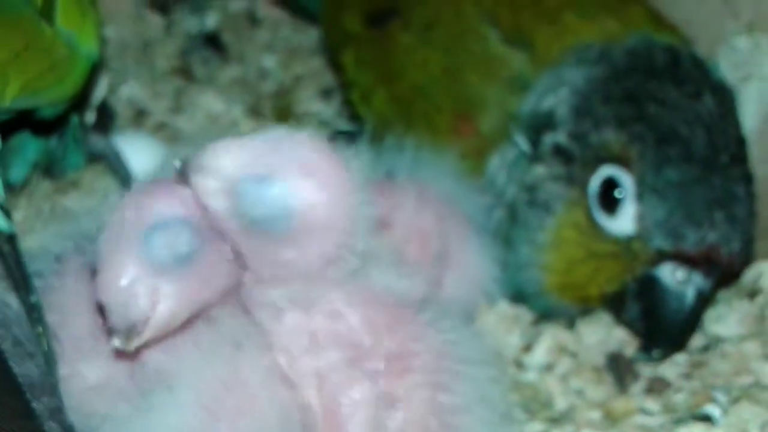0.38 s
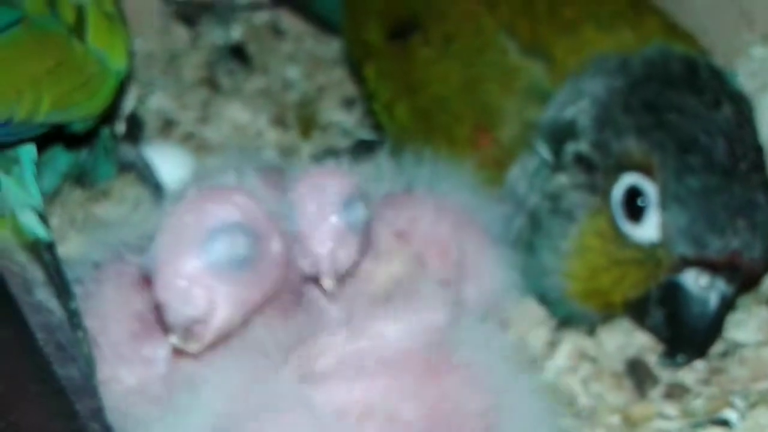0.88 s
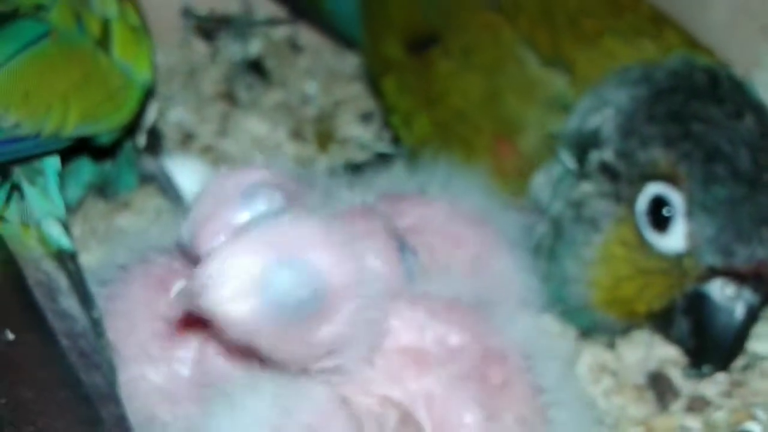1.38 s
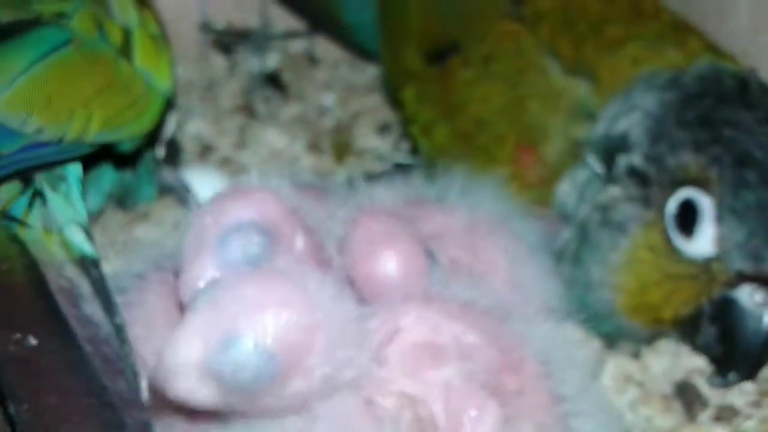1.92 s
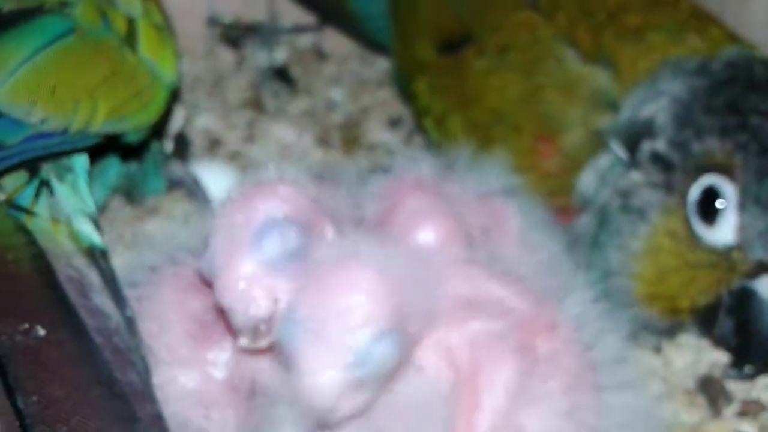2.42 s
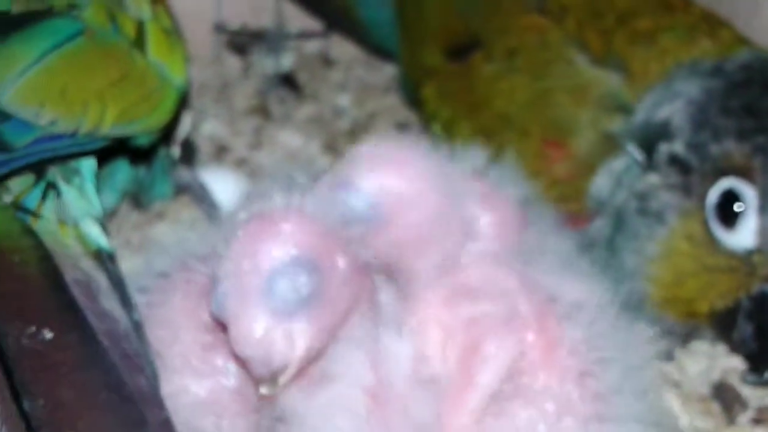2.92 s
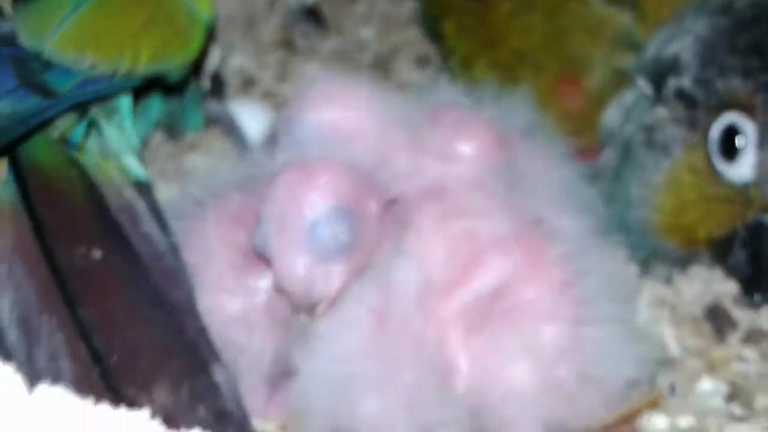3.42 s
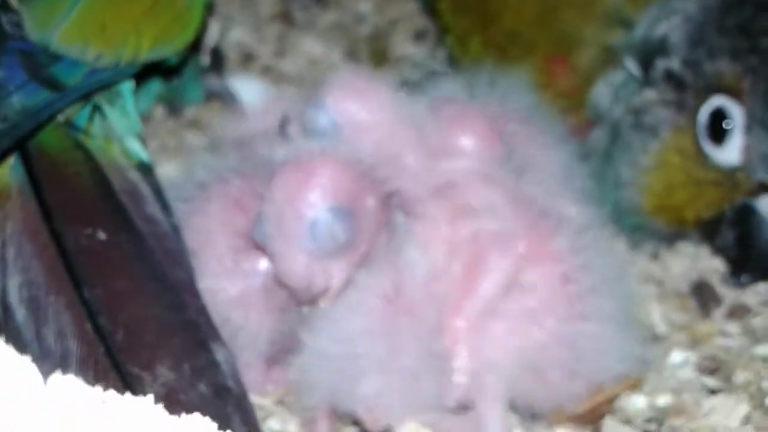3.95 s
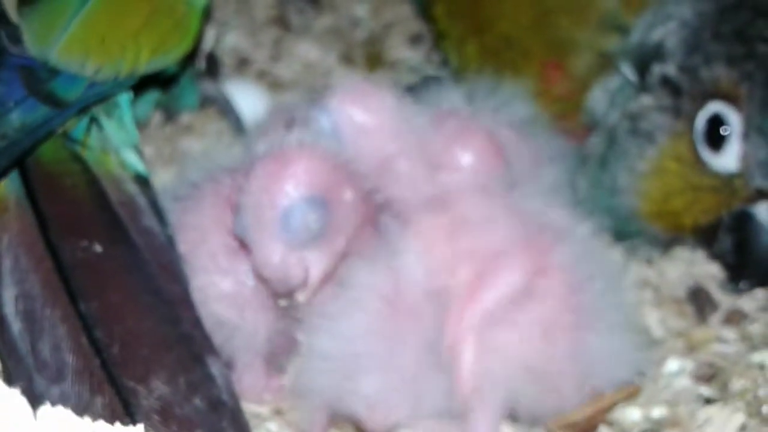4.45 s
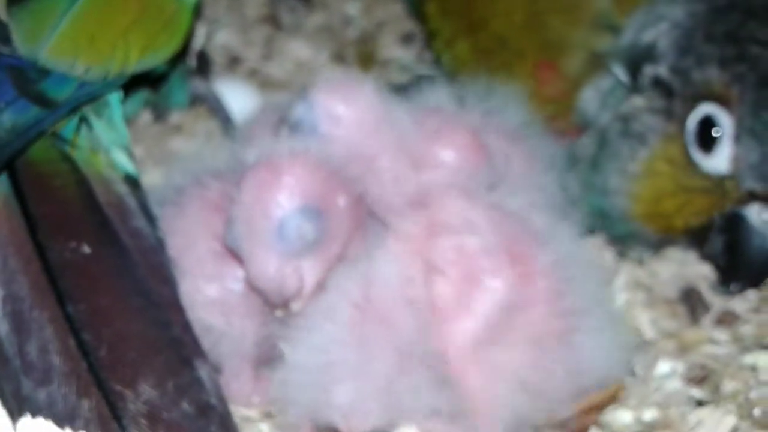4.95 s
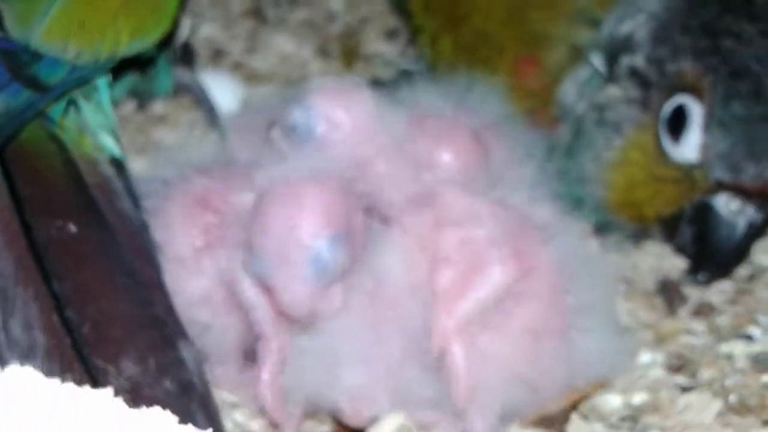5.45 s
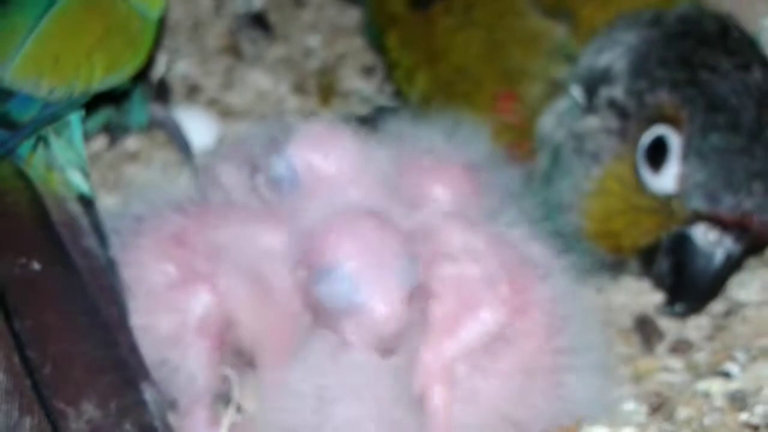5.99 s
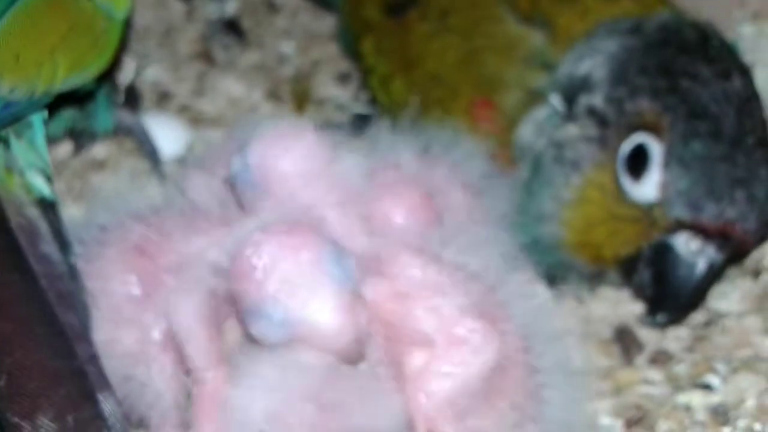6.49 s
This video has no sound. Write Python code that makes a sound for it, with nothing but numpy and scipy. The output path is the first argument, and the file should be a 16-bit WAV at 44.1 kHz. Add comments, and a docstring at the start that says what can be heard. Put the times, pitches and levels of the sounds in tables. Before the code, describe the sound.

Parrot chicks beg very near a small microphone in a wooden nest box, with short bright reflections and a faint room hush. A chick is already rasping at the start, in airy, rough bursts to about 0.6 seconds, with a thin whistle wavering beside it. Peeps and short whistles cluster from 0.5 to 1 second. Harsh five-part squawks at 1.0 and 1.25 alternate low rising buzzes with shrill cries. Hissing rasps repeat from 1.4 to 2.4, then the calls grow faint and sparse. Tiny chirps and whistles flurry around 3.0 to 3.3, followed by another squawk. Three strong rasps come between 3.75 and 4.3. A soft double wall nudge at 4.55 precedes a squawk at 4.7, more rasps around 5 to 5.5, a leaping whistle at 5.4, and final squawks at 5.6 and 5.8. Quiet follows, with barely audible peeping, before a soft hollow hiss swells from 6.3 to 6.6.

```python
"""Parrot chicks beg in a small wooden nest box, close to the microphone, over a quiet room hush.
One is already rasping in hissing bursts made by a rough membrane and air; a long whistle wavers beside it.
Softer peeps and whistles, tones with a few overtones, soon join in, and the box rings briefly after each call.
From about one second a chick repeats a five-part squawk, in which two membranes take turns.
Later the wooden wall is nudged twice, and at the end a soft hollow hiss of filtered noise grows."""
import sys
import numpy as np
from scipy import signal
from scipy.fft import rfft, irfft
from scipy.io import wavfile
from scipy.ndimage import uniform_filter1d, minimum_filter1d

SR = 44100
rng = np.random.default_rng(int(sys.argv[2]) if len(sys.argv) > 2 else 0)


def store_pcm(level_fs):
    """Save levels as 16-bit WAV."""
    pcm = np.round(np.clip(level_fs, -1, 1) * 32767).astype(np.int16)
    wavfile.write(sys.argv[1], SR, np.atleast_2d(pcm).T)


def field_ratio(decibels):
    """Amplitude ratio for a level in dB (20 dB per decade); scalars and array-likes work."""
    return 10 ** (np.asarray(decibels, dtype=float) / 20)


N = 291501  # length in samples

# The room hush. Each row: frequency in Hz, relative strength in dB.
HUSH_SPECTRUM = [(12, -44.5), (20, -16), (175, -11.5), (906, -16.5), (1630, -13), (2470, -18), (3170, -22),
                 (3450, -18), (5090, -17), (6540, -16.5), (7950, -25.5), (9130, -27.5), (15500, -30)]
# How the hush drifts. Each row: time in seconds, level in dB of its part between 60 and 500 Hz.
HUSH_LEVEL = [(0.0, -60.5), (0.62, -64.5), (1.16, -61), (1.58, -73.5), (1.86, -71), (2.08, -67.5),
              (2.61, -62.5), (2.93, -66.5), (3.18, -63.5), (3.59, -69), (3.85, -70), (4.67, -61),
              (5.15, -71.5), (5.36, -72.5), (5.45, -68.5), (6.35, -77), (6.61, -68.5)]

# Rasps: each swells while the chick pushes, then dies away. Each row: start in seconds, length of the push
# in seconds, swell time in seconds, level in dB at full swell, first pitch in Hz, held pitch in Hz,
# extra lowest line in dB once its early lead is over.
RASPS = [(-.06, 0.067, .02, -14.5, 2100, 2902, -4.5), (0.144, 0.087, 0.033, -12, 2100, 2816, -4),
         (.365, 0.14, 0.07, -12, 2350, 2868, -2), (0.564, 0.04, 0.014, -22, 2600, 2574, -14),
         (.788, 0.054, 0.005, -35, 2830, 3080, 8), (0.943, .085, 0.0061, -28.5, 2190, 2210, -2),
         (1.386, 0.024, .006, -20.5, 2900, 2900, -9.5), (1.49, .16, .028, -22.5, 2100, 3036, 1),
         (1.72, 0.15, 0.037, -20.5, 2300, 3036, 2.5), (1.945, .16, 0.037, -16, 1600, 2870, 3),
         (2.109, 0.062, 0.013, -15, 2950, 3282, -13.5), (2.271, 0.083, 0.031, -14, 2190, 2888, -2),
         (2.47, 0.051, 0.021, -42, 2800, 2610, -2), (2.636, .04, 0.015, -49, 3100, 2980, 10),
         (2.685, 0.098, 0.0035, -44, 2360, 2380, 13), (3.038, 0.087, .003, -43, 2400, 2420, -6),
         (3.216, .03, 0.0045, -42, 2600, 2705, -19), (3.764, .082, .02, -17, 2100, 2955, -4.5),
         (3.974, .091, 0.029, -15.5, 1900, 2935, -2.5), (4.239, .085, 0.019, -15.5, 2000, 2925, -4.5),
         (4.958, .105, 0.016, -17.5, 2500, 2943, -1.5), (5.065, 0.052, .012, -22, 2850, 3275, -8),
         (5.179, .103, 0.016, -19.5, 2500, 2874, -3.5), (5.485, 0.083, 0.029, -17, 2170, 2863, 2),
         (6.2, 0.073, 0.021, -60, 2400, 2984, -1)]
# How throat and beak colour a rasp. Each row: frequency in Hz, gain in dB.
RASP_TRACT = [(350, -61.5), (600, -39), (2950, -14.5), (3520, -15), (4430, -1), (5900, -4), (10200, -20),
              (15500, -46.5)]
RASP_START_DB, RASP_FALL_DB_PER_S, RASP_TAIL_S = -24, -380, .12
RASP_SAG_HZ_PER_S = -300  # the pitch slips as the push ends
RASP_SCOOP_S = .018  # how fast the pitch glides from first to held
RASP_SWELL_BEND = 1.39  # above 1 the swell starts slowly
RASP_AIR = .55  # greatest share of pure air, 0 to 1, at full swell
LOWEST_LEAD_DB, LOWEST_LEAD_S = 13, 0.037  # the lowest line leads, then the upper ones take over

# Box reflections. Each row: frequency in Hz, time in seconds to die by 60 dB.
BOX_DECAY = [(800, 0.043), (2000, 0.19), (4000, 0.24), (8000, 0.19), (14000, 0.21)]
BOX_DB = -5.5  # reflections against the direct sound

# A long wavering whistle, and a swoop that leaps, drops and holds.
# Each row within a call: time in seconds, pitch in Hz, level in dB.
LONG_WHISTLES = [
    [(0.0, 2230, -36.5), (0.028, 2204, -25), (0.088, 2140, -40), (0.138, 2248, -18.5), (0.148, 2274, -30),
     (0.235, 2272, -38), (0.257, 2214, -23.5), (0.336, 2160, -31.5), (0.366, 2213, -60), (0.375, 2322, -39)],
    [(5.365, 2060, -32.5), (5.378, 5000, -32), (5.392, 5210, -24.5), (5.402, 3520, -28.5),
     (5.413, 3360, -40), (5.422, 3436, -25), (5.45, 3280, -32), (5.49, 3430, -63)],
]

# Peeps rich in overtones. Each row: start in seconds, rise in seconds, fall in seconds,
# first pitch in Hz, pitch at the turn in Hz, last pitch in Hz, level at the turn in dB.
BUZZES = [(.368, 0.055, 0.11, 1106, 1316, 1420, -33), (0.703, 0.024, 0.017, 1305, 1505, 1800, -35),
          (0.79, 0.021, 0.036, 1635, 1868, 1700, -27.5), (3.56, 0.031, 0.025, 4480, 4240, 4445, -43),
          (6.25, .03, 0.022, 1650, 1670, 1701, -59)]
# Voice of the buzzes: step from each harmonic to the next in dB, then start and end against the turn in dB.
BUZZ_VOICE = (-2.8, -19.5, -12.5)
# Rough peeps. Each row: start in seconds, rise in seconds, fall in seconds,
# first pitch in Hz, pitch at the turn in Hz, last pitch in Hz, level at the turn in dB.
CHIRRS = [(0.531, .025, .03, 1546, 1455, 1340, -34.5), (.575, 0.011, 0.015, 2600, 2443, 860, -30),
          (.695, 0.026, 0.0093, 2780, 2130, 2330, -28.5), (0.726, 0.021, 0.027, 2317, 2925, 2850, -23.5),
          (.73, .02, 0.039, 5300, 5550, 4400, -37), (0.945, .024, .025, 2004, 2280, 1863, -21.5),
          (0.991, 0.0095, 0.025, 2400, 2164, 1640, -26.5), (2.43, 0.063, .07, 1120, 1743, 934, -42.5),
          (2.686, 0.014, 0.12, 1000, 1163, 960, -42.5), (2.838, 0.054, 0.097, 1960, 2280, 2060, -49.5),
          (2.919, 0.036, 0.038, 1700, 1462, 1110, -52), (3.038, 0.033, 0.032, 5300, 4200, 4200, -37.5),
          (3.085, 0.033, 0.031, 1565, 1224, 1190, -42.5), (3.097, 0.01, 0.027, 5440, 4990, 5050, -36.5),
          (3.161, 0.063, 0.054, 1480, 1346, 1420, -52.5), (3.222, .008, .015, 5600, 4800, 4000, -38.5),
          (3.243, .012, .02, 3500, 3050, 2600, -53.5), (3.292, .008, .016, 2200, 1500, 800, -31.5),
          (4.44, 0.024, 0.026, 1400, 1450, 1360, -52), (5.28, 0.025, 0.047, 1660, 2084, 1366, -34),
          (5.475, .022, .01, 1600, 2000, 2220, -39.5)]
# Voice of the chirrs: step from each harmonic to the next in dB, then start and end against the turn in dB.
CHIRR_VOICE = (-16, -10.5, -13)
# Short whistles. Each row: start in seconds, rise in seconds, fall in seconds,
# first pitch in Hz, pitch at the turn in Hz, last pitch in Hz, level at the turn in dB.
WHISTLES = [(.61, .045, 0.043, 3670, 3514, 3480, -25.5), (.85, .03, 0.028, 3240, 3506, 3500, -17),
            (.878, 0.013, 0.011, 2510, 2097, 2050, -26.5), (3.075, 0.014, 0.0086, 5470, 5720, 5700, -31.5),
            (3.218, 0.021, 0.024, 6020, 5765, 5750, -31.5), (3.245, 0.017, 0.017, 1585, 1457, 1420, -34),
            (3.278, 0.017, 0.0051, 2534, 2110, 2100, -27), (3.737, 0.016, .025, 5520, 5790, 5900, -41),
            (5.44, 0.0091, 0.017, 2750, 2150, 1700, -33)]
# Voice of the whistles: step from each harmonic to the next in dB, then start and end against the turn in dB.
WHISTLE_VOICE = (-17, -9.5, -27.5)
BUZZ_ROUGH, CHIRR_ROUGH, WHISTLE_ROUGH = .4, .56, .12  # 0 is smooth, 1 is roughest
TURN_SHARPNESS = 1.3  # 1 is a corner in the pitch, 2 a round arch

# Parts of a squawk before it is stretched and tuned, low voice. Each row: start in seconds, end in seconds,
# first pitch in Hz, last pitch in Hz, first level in dB, last level in dB (both against the voice's level),
# roughness from 0 to 1, list of relative harmonic strengths in dB.
SQUAWK_LOW = [(0, .036, 972.4, 1335, -13, -1.5, 0.4, [-11.5, -10.5, -8, 4, -2, -8, -22, -16.5]),
              (.056, .112, 1110, 1382, -6, -5.5, 0.1, [-11.5, -12, -1, 7, -18, -7.5, -18, -17.5])]
# The same for the high voice. Each row: start in seconds, end in seconds, first pitch in Hz, last pitch in Hz,
# first level in dB, last level in dB, roughness from 0 to 1, list of relative harmonic strengths in dB.
SQUAWK_HIGH = [(.034, .07, 3402, 2970, 5.8, -4.5, 0.33, [-14.5, 0.5, -18, -30]),
               (.1, .145, 3580, 3503, 1, -4.5, .5, [-12.5, -1, -20.5, -29]),
               (.121, .16, 4050, 4080, 2, -12, 0.24, [-1, -8.5, -27.5])]
# Squawks. Each row: start in seconds, length factor, pitch factor, low voice in dB, high voice in dB.
SQUAWKS = [(1.016, 1.023, 0.99, -9, -13.5), (1.266, 0.94, 1, -12, -16.5), (3.318, 0.94, 0.98, -10.5, -13),
           (4.734, 0.94, 0.98, -11, -13), (5.566, 1.01, 1.01, -13, -15.5), (5.827, 0.89, 1.018, -15.5, -16)]
# Colour of a squawk's breath noise. Each row: frequency in Hz, gain in dB.
SQUAWK_AIR = [(290, -82), (500, -39.5), (696, -46.5), (839, -80), (1220, -10), (1900, -16.5), (3240, -12.5),
              (6550, 1.5), (8720, -22.5), (9650, -12.5), (15500, -33)]

# Nudges against the box wall. Each row: time in seconds, level in dB.
KNOCKS = [(4.554, -43), (4.599, -55)]
# Low ringing modes of the wall. Each row: frequency in Hz, relative level in dB, time in seconds to die by 60 dB.
WALL_MODES = [(366, 3.5, 0.23), (651, -11.5, 0.41), (1017, -22.5, .15)]

# A soft hollow hiss grows. Each row: time in seconds, level in dB.
SWELL_LEVEL = [(6.301, -67.5), (6.46, -56.5), (6.5, -52.5), (6.61, -46)]
# Its hollow colour. Each row: frequency in Hz, gain in dB.
SWELL_TONE = [(180, -52), (300, -23), (421, -41.5), (769, -6), (970, -17.5), (1170, -20), (1380, -2.5),
              (2030, -11.5), (2200, -15), (2950, -11.5), (3490, -24), (4610, -11.5), (6680, -18),
              (9230, -30), (12000, -58.5), (15600, -74.5), (22000, -120)]


def read(points, hz):
    """Joins (Hz, value) points on a log-frequency axis."""
    f, value = np.transpose(points)
    return np.interp(np.log(hz + 1), np.log(f + 1), value)


def evened(x):
    """Scales to an average strength (rms) of 1."""
    return x / np.sqrt(np.mean(x ** 2) + 1e-20)


def coloured(x, points):
    """Filters x by a curve of (Hz, dB) points."""
    hz = np.fft.rfftfreq(len(x), 1 / SR)
    return irfft(rfft(x) * field_ratio(read(points, hz)), len(x))


def wander(shape, hz):
    """Smooth chance of rms about 1: noise with its changes faster than hz held back."""
    smooth = signal.butter(2, hz, fs=SR, output="sos")
    twice = np.tile(rng.standard_normal(shape), 2)  # the first pass lets the filter settle
    return evened(signal.sosfilt(smooth, twice)[..., -np.max(shape):])


def flutter(shape, rough, hz):
    """A gain that stays at 1 when smooth and swings through zero when rough."""
    return 1 - rough + rough * np.tanh(wander(shape, hz))


def patchy(x, depth_db, bins, frames):
    """Turbulence: loud and soft patches come and go over time and frequency."""
    z = signal.stft(x, nperseg=256, noverlap=192)[2]
    field = uniform_filter1d(rng.standard_normal(z.shape), bins, 0)
    field = uniform_filter1d(field, frames, 1)
    patches = signal.istft(z * field_ratio(depth_db * evened(field)), nperseg=256, noverlap=192)[1]
    return np.resize(patches, len(x))


def add(mix, s, sound):
    """Mixes a sound in at time s, which may lie before zero."""
    at = round(s * SR)
    sound = sound[max(-at, 0):]
    part = mix[max(at, 0):][:len(sound)]
    part += sound[:len(part)]


def membrane(hz, rough, harmonics_db):
    """Harmonics of a fluttering membrane; roughness shakes its pitch, chops its strength and frays each line."""
    rough, count = np.clip(rough, 0, 1), len(harmonics_db)
    shake = .05 * wander(len(hz), 300) + .04 * wander(len(hz), 40)
    turns = np.cumsum(hz * (1 + rough * shake)) / SR
    k = np.arange(1, count + 1)[:, None]
    below_top = np.clip((15000 - k * hz) / 1000, 0, 1)  # lines fade out from 14 to 15 kHz
    weight = field_ratio(np.reshape(harmonics_db, (count, 1))) * below_top
    lines = weight * flutter((count, len(hz)), .6 * rough, 80)
    phase = k * turns + rng.random((count, 1))
    tone = (lines * np.cos(2 * np.pi * phase)).sum(0)
    return evened(tone * flutter(len(hz), rough, 190))


def hush():
    """Room and microphone noise that wavers a little."""
    noise = patchy(coloured(rng.standard_normal(N), HUSH_SPECTRUM), 3, bins=2, frames=60)
    low = signal.sosfilt(signal.butter(4, [60, 500], "band", fs=SR, output="sos"), noise)
    s, db = np.transpose(HUSH_LEVEL)
    return noise / low.std() * field_ratio(np.interp(np.arange(N) / SR, s, db))


def rasp(push, swell_s, db, first_hz, held_hz, lowest_db):
    """A chaotic membrane with alternating pulses, blown with much air through the beak."""
    t = np.arange(0, push + RASP_TAIL_S, 1 / SR)
    slackening = np.maximum(t - push, 0)  # seconds since the push ended
    rising = np.exp(-(t / swell_s) ** RASP_SWELL_BEND)  # 1 at the start, 0 at full swell
    effort_db = db + RASP_START_DB * rising + RASP_FALL_DB_PER_S * slackening
    glide = (first_hz - held_hz) * np.exp(-t / RASP_SCOOP_S)
    hz = held_hz + glide + RASP_SAG_HZ_PER_S * slackening
    throat_db = lowest_db + LOWEST_LEAD_DB * np.exp(-(t / LOWEST_LEAD_S) ** 2)
    slack = np.clip((3230 - hz) / 200, .05, 1)  # a tight, high membrane pulses evenly and leaks little air
    air = slack * RASP_AIR * (1 - rising / 2)  # the start is more voiced
    rough = .45
    lowest = field_ratio(throat_db) * membrane(hz, rough, [0])
    main = membrane(hz, rough, [-13.0, 6, -16.5, 7, 3.5]) + lowest
    # strong-weak pulses fill in half-pitch lines
    halves = membrane(hz / 2, rough, [2.5, -23.5, 5, 4.5, 3.0, -15.0, 3.5, -5, -15.5])
    voiced = evened(coloured(main + 1.4 * slack * halves, RASP_TRACT))
    breath = coloured(rng.standard_normal(len(t)), RASP_TRACT)
    hiss = evened(patchy(breath, 5, bins=3, frames=14))
    fade = np.clip(np.minimum(t, t[-1] - t) / 0.0041, 0, 1)
    return field_ratio(effort_db) * fade * (np.sqrt(1 - air) * voiced + np.sqrt(air) * hiss)


def box(x):
    """Dense reflections, each band dying at its own speed."""
    hz, t, z = signal.stft(rng.standard_normal(SR // 2), SR, nperseg=256)
    decay = field_ratio(-60 * t / read(BOX_DECAY, hz)[:, None])
    tail = signal.istft(z * decay, SR, nperseg=256)[1]
    tail = np.r_[np.zeros(120), tail]  # a short wait, in samples, before the reflections
    return signal.fftconvolve(x, tail / np.linalg.norm(tail))[:N]


def peep(rough, tilt_db, rows, count=4):
    """A whistle through (s, Hz, dB) points, with overtones that change in strength by tilt_db a step."""
    s, hz, db = np.transpose(rows)
    t = np.arange(s[0], s[-1], 1 / SR)
    fade = np.clip(np.minimum(t - s[0], s[-1] - t) / 0.00057, 0, 1)
    tone = membrane(np.interp(t, s, hz), rough, tilt_db * np.arange(count))
    # a half-shut beak dulls the top
    tone = signal.sosfilt(signal.butter(4, 11000, fs=SR, output="sos"), tone)
    return field_ratio(np.interp(t, s, db)) * fade * tone


def add_calls(mix, calls, rough, tilt_db, start_db, end_db, count=4):
    """Short peeps that share one voice; pitch and level bend towards the turn and away again."""
    away = np.linspace(-1, 1, num=21)  # -1 at the start, 0 at the turn, 1 at the end
    before, bend = away < 0, away ** 2
    for s, rise, fall, first_hz, turn_hz, last_hz, db in calls:
        # rows give the start; the turn comes one rise later
        times = rise + away * np.where(before, rise, fall)
        outer_hz = np.where(before, first_hz, last_hz)
        hz = turn_hz + (outer_hz - turn_hz) * abs(away) ** TURN_SHARPNESS
        level_db = db + np.where(before, start_db, end_db) * bend
        add(mix, s, peep(rough, tilt_db, np.transpose([times, hz, level_db]), count))


def add_squawk(mix, s, stretch, pitch, low_db, high_db):
    """Two membranes take turns: a low rising buzz and a high harsh cry, with breath noise."""
    for parts, db in ((SQUAWK_LOW, low_db), (SQUAWK_HIGH, high_db)):
        for start, end, first_hz, last_hz, first_db, last_db, rough, harmonics_db in parts:
            hz = pitch * np.linspace(first_hz, last_hz, round((end - start) * stretch * SR))
            breath = coloured(rng.standard_normal(len(hz)), SQUAWK_AIR)
            air = evened(patchy(breath, 4, bins=3, frames=8))
            sound = membrane(hz, rough, harmonics_db) + field_ratio(-9) * air
            push_db = db + np.linspace(first_db, last_db, len(hz))
            fade = signal.windows.tukey(len(hz), .4)
            add(mix, s + start * stretch, field_ratio(push_db) * sound * fade)


def knock():
    """The wooden wall rings on its low modes."""
    t = np.arange(SR // 4) / SR
    ring = sum(field_ratio(db - 60 * t / t60) * np.sin(2 * np.pi * hz * t) for hz, db, t60 in WALL_MODES)
    return ring * np.minimum(t / 0.0065, 1)  # a soft onset, in seconds


def swell():
    """Noise through a few hollow resonances, rising."""
    s, db = np.transpose(SWELL_LEVEL)
    t = np.arange(s[0], s[-1], 1 / SR)
    hiss = evened(coloured(rng.standard_normal(len(t)), SWELL_TONE))
    return field_ratio(np.interp(t, s, db)) * hiss


def scene():
    """All chicks in the box, with the nudges and the late hiss, over the hush."""
    chicks = np.zeros(N)
    for s, *row in RASPS:
        add(chicks, s, rasp(*row))
    for rows in LONG_WHISTLES:
        add(chicks, rows[0][0], peep(WHISTLE_ROUGH, -19, rows))
    add_calls(chicks, BUZZES, BUZZ_ROUGH, *BUZZ_VOICE, count=8)
    add_calls(chicks, CHIRRS, CHIRR_ROUGH, *CHIRR_VOICE)
    add_calls(chicks, WHISTLES, WHISTLE_ROUGH, *WHISTLE_VOICE)
    for row in SQUAWKS:
        add_squawk(chicks, *row)
    # tiny beaks give no bass
    inside = signal.sosfilt(signal.butter(6, 800, "high", fs=SR, output="sos"), chicks)
    for s, db in KNOCKS:
        add(inside, s, field_ratio(db) * knock())
    add(inside, SWELL_LEVEL[0][0], swell())
    return (inside + field_ratio(BOX_DB) * box(inside) + hush())[None]


def roll_off(x):
    """The treble ends steeply here."""
    return signal.sosfilt(signal.butter(12, 15990, fs=SR, output="sos"), x)


def record(dry):
    """The small microphone drops the deep bass, then a fast limiter holds the peaks."""
    heard = signal.sosfilt(signal.butter(2, 65, "high", fs=SR, output="sos"), dry)
    peaks = -minimum_filter1d(-abs(heard), size=129)  # the highest level nearby
    crest = uniform_filter1d(peaks, size=129)
    ceiling = .68  # of full scale
    return roll_off(heard / np.maximum(crest / ceiling, 1))


dry = scene()
out = record(dry)
store_pcm(out)
```